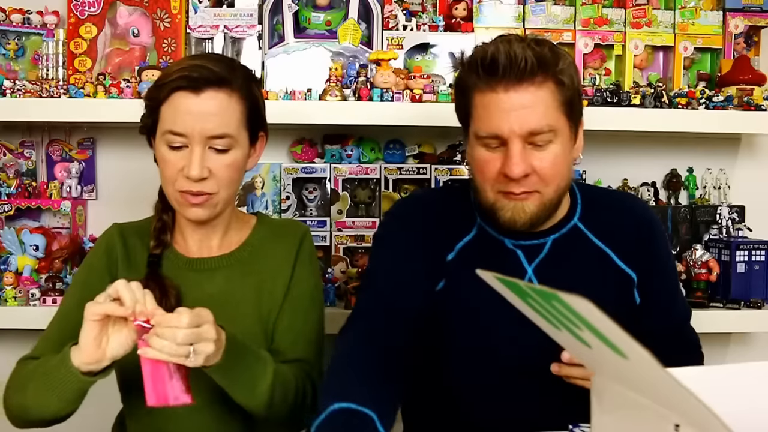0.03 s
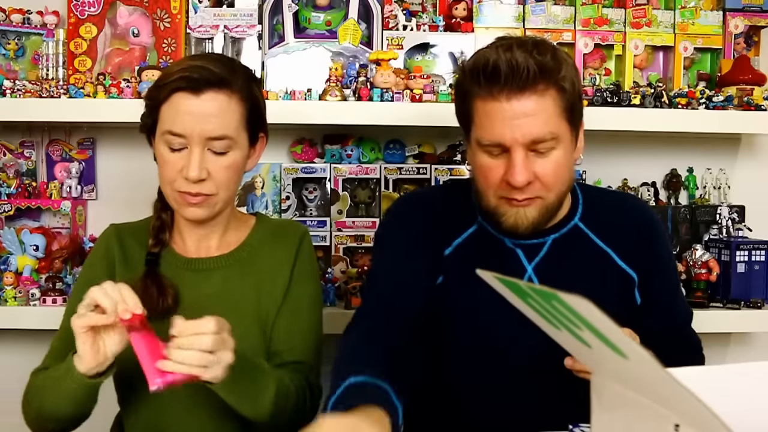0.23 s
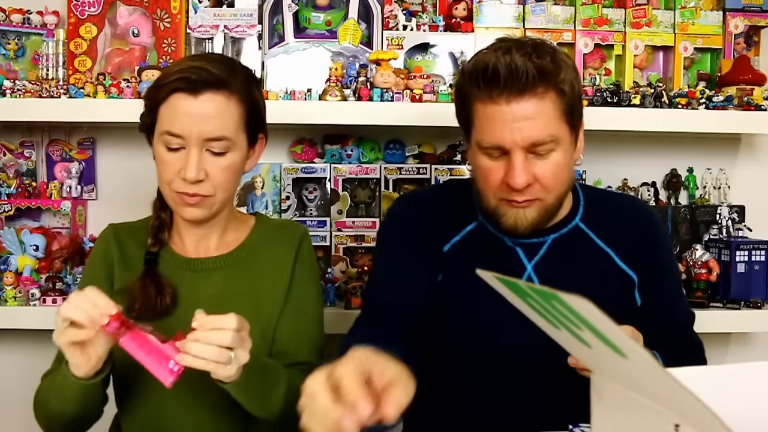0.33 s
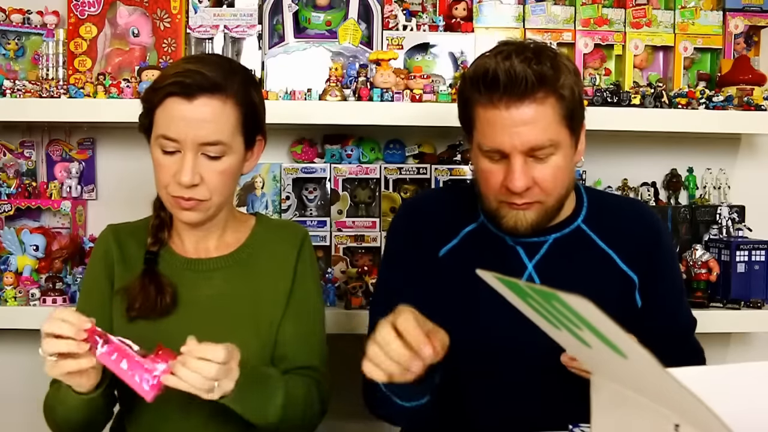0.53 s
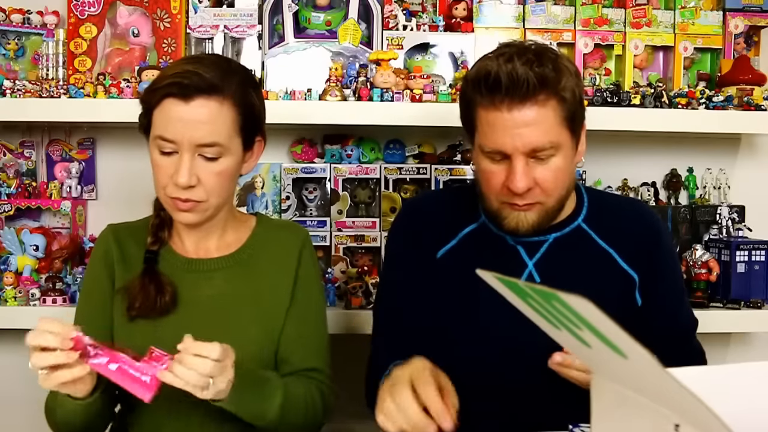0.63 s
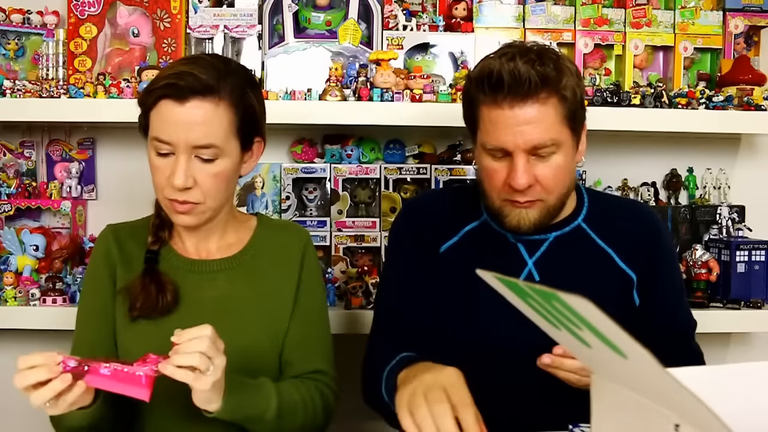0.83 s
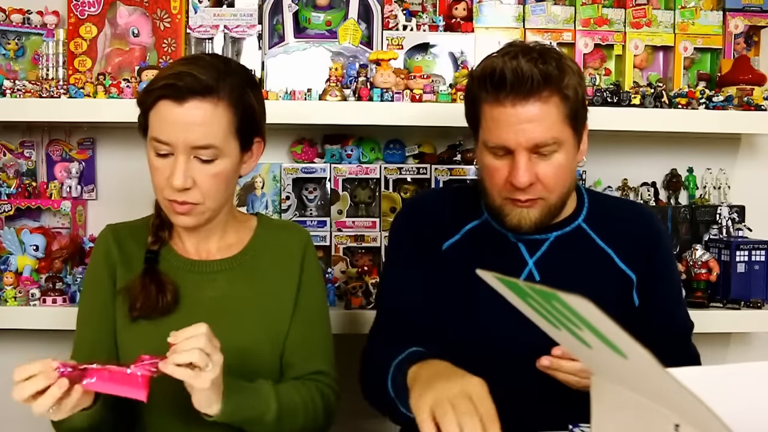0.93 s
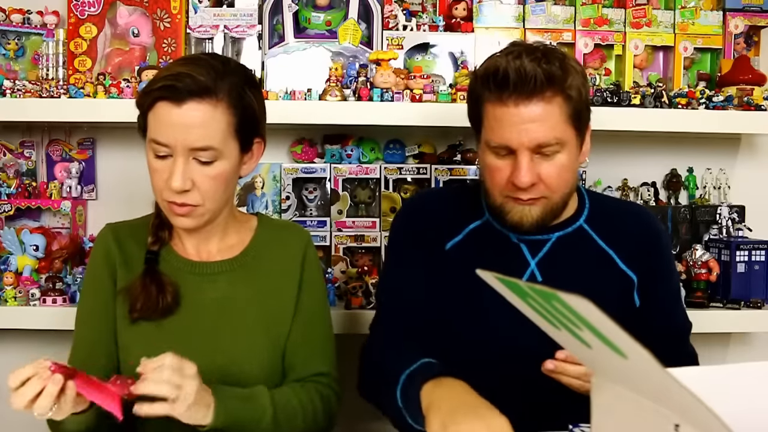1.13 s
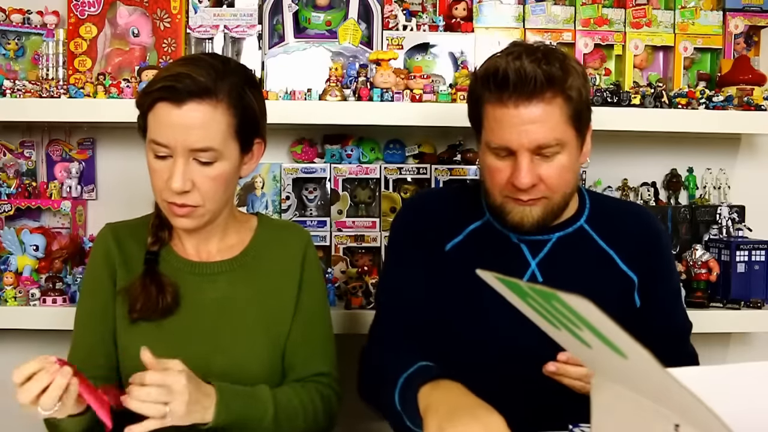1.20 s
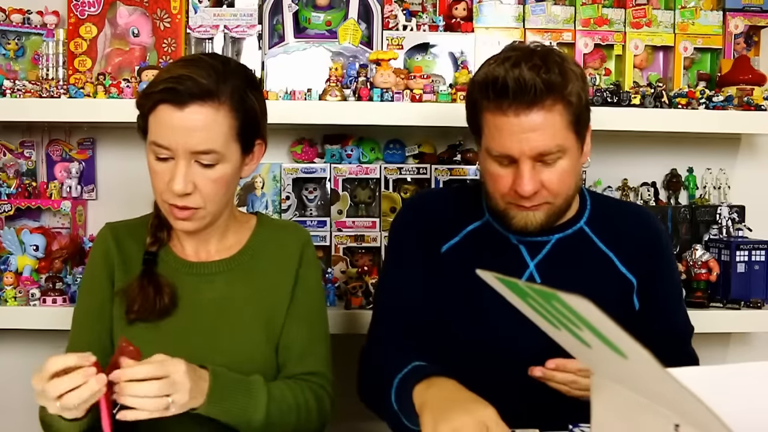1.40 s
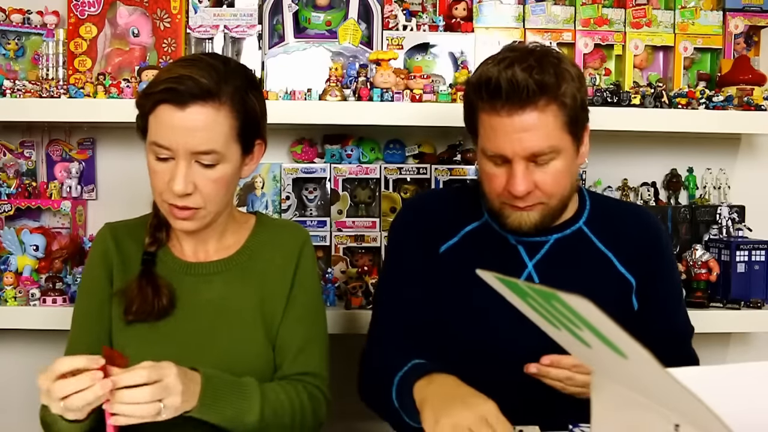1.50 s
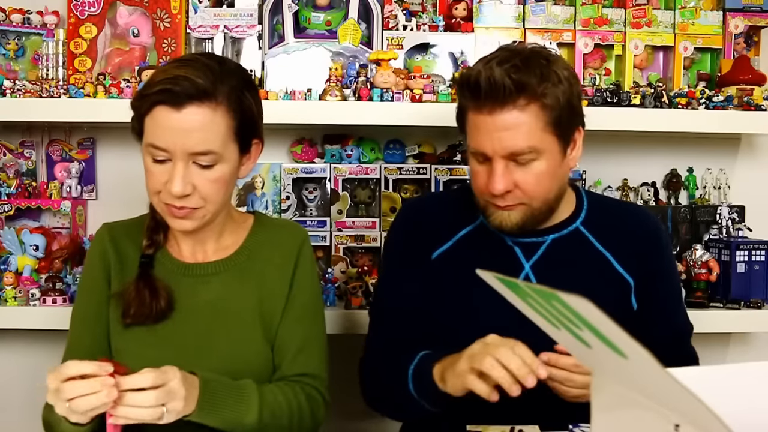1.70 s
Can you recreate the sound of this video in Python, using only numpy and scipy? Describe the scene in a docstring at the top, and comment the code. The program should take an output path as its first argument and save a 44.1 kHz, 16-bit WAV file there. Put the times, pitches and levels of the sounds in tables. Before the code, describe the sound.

Crackling plastic packet in the hands, slightly left: bright irregular snaps, an early arm bump on the table, a dense peak of crinkling, sparser ticks, then another small cluster, close up in a quiet room.

```python
"""A hand pulls open a thin plastic wrapper, slightly left of two microphones in a small quiet room.
From the start, creases buckle as sharp resonant snaps among flurries of crackle, showers of random clicks.
An arm then bumps the table, softly and at once loudly: thud, smack and decaying modes of the table top.
The snaps soon crowd together and peak, thin out, and gather again near the end among soft bumps.
Arm rumble, a wavering low sine hum and shaped noise as faint hiss lie underneath throughout."""
import sys
import numpy as np
from scipy import signal
from scipy.fft import rfft, irfft
from scipy.io import wavfile

SR = 44100
rng = np.random.default_rng(int(sys.argv[2]) if len(sys.argv) > 2 else 0)


def to_wav(s):
    """Save 16-bit WAV."""
    ch = np.atleast_2d(s).T  # columns
    pcm = np.round(np.clip(ch, -1, 1) * 32767)  # PCM
    wavfile.write(sys.argv[1], SR, pcm.astype(np.int16))


N = 77175

SIZE = 2048  # samples in a spectrum frame
HZ = np.fft.rfftfreq(SIZE, 1 / SR)
FLEX_HZ, FLEX_OCT = 1296, 1.15  # low flexing of the film: centre in Hz, width in octaves


def amp(db):
    """Logarithmic level: decibels to amplitude gain."""
    return 10 ** (np.asarray(db) / 20)


def unit(x):
    """Normalisation: scales to an rms of 1."""
    return x / np.sqrt(np.mean(x ** 2) + 1e-20)


def read(points, hz):
    """Logarithmic pitch scale: interpolates a curve along log frequency."""
    f, value = np.transpose(points)
    return np.interp(np.log(hz + 1), np.log(f + 1), value)


def add(mix, s, sound):
    """Superposition: adds a sound to the mix from time s in seconds."""
    part = mix[max(round(s * SR), 0):][:len(sound)]
    part += sound[:len(part)]


def hump(hz, octaves):
    """Resonance: a bell of unit mean power on a log-frequency axis, steeper below its centre."""
    low_side = 0.91  # width below the centre relative to that above
    away = np.log2((HZ + 1) / hz) / octaves
    away = np.where(away < 0, away / low_side, away)
    return unit(np.exp(-(away / 2) ** 2))


def pulse(gain):
    """Minimum phase: the causal click whose phase follows from its log spectrum by Hilbert transform."""
    log_gain = np.log(gain + gain.max() / 1000)  # the floor keeps the logarithm finite
    full = np.r_[log_gain, log_gain[-2:0:-1]]
    spectrum = np.exp(np.conj(signal.hilbert(full)))
    return np.fft.ifft(spectrum).real[:SIZE // 2]


def even(burst):
    """Partial whitening: flattens most of a burst's spectral unevenness and sets its energy to 1."""
    z = rfft(burst, 2 * len(burst))
    burst = irfft(z / (abs(z) + 1e-9) ** .75)[:len(burst)]
    return burst / np.linalg.norm(burst)


def click(drive, gain):
    """Source and filter: a short stereo drive excites a resonance, with energy set by its spectrum."""
    window_s = .00277  # the spectrum's level is the rms over this time
    sound = signal.fftconvolve(drive, pulse(gain)[None], axes=1)
    energy = np.mean(gain ** 2) * window_s * SR
    return sound / np.linalg.norm(sound.mean(0)) * np.sqrt(energy)


def diffuse(z, tone):
    """Spatial coherence: colours two noises and mixes them to a frequency-dependent likeness."""
    # Left-right likeness of diffuse sound. Each row: frequency in Hz, correlation from -1 to 1.
    likeness = [(50, -0.051), (300, 0.71), (1000, .8), (2500, 0.38), (5000, 0.72), (9000, -0.019),
                (14000, -0.067)]
    hz = np.fft.rfftfreq(z.shape[1], 1 / SR)
    a, b = rfft(z) * amp(read(tone, hz))
    same = np.clip(read(likeness, hz), -1, 1)
    right = same * a + np.sqrt(1 - same ** 2) * b
    return irfft(np.array([a, right]), z.shape[1])


def lean(db):
    """Level panning: raises the left and lowers the right by the same decibels."""
    return amp([[db], [-db]])


def snaps():
    """Buckling: each crease creaks, pops, excites film resonances and settles in tiny slips."""
    # Creases that buckle. Each row: time in seconds, ring level in dB before trim, film pitch in Hz,
    # flexing level in dB before trim, tick level in dB before trim, panel note in Hz,
    # panel level in dB before trim, settling time constant in seconds.
    creases = [(0.048, -31.5, 7550, -58, -45, 3680, -59, 0.00075),
               (0.0554, -41, 6600, -68, -47, 4220, -61, 0.0018),
               (0.089, -39.5, 4700, -38.5, -45.5, 2420, -60, 0.0048),
               (0.0921, -47, 7440, -46.5, -52, 2050, -50, 0.0018),
               (0.1663, -26.5, 9700, -30, -57, 1150, -42, 0.00082),
               (0.1916, -43, 6700, -38, -42.5, 1490, -41, 0.0042),
               (0.2298, -65, 7100, -47, -75, 1750, -58, 0.001),
               (0.2758, -17, 5670, -29, -29.5, 1730, -31.5, 0.00095),
               (0.2847, -56, 6640, -39, -33.5, 3030, -38, 0.0027),
               (0.2996, -33, 5940, -37, -31, 2670, -37.5, 0.0059),
               (0.3178, -33, 7300, -35.5, -31.5, 4100, -45, 0.0019),
               (0.3244, -35.5, 5400, -29, -39, 4160, -38, 0.0046),
               (0.346, -26.5, 9350, -52, -36, 4220, -63, 0.0011),
               (0.3724, -34, 7400, -34.5, -48, 4300, -55, 0.0022),
               (0.3794, -23, 7500, -37, -44, 3150, -48, 0.0019),
               (0.3892, -37, 8000, -44, -48, 2910, -41, 0.0012),
               (0.4089, -24.5, 8300, -54.5, -37, 2830, -38.5, 0.0015),
               (0.4559, -50, 5800, -56, -46, 3960, -50, 0.0012),
               (0.4647, -29, 6300, -41, -47, 2540, -68, 0.00048),
               (0.53, -41.5, 6900, -43.5, -49.5, 4200, -61, 0.00047),
               (0.5848, -32, 7000, -47.5, -57, 1590, -49.5, 0.00043),
               (0.603, -25, 8100, -39, -34, 4300, -42, 0.0012),
               (0.6224, -32, 7160, -45, -42, 2660, -42, 0.0021),
               (0.6784, -52, 5200, -49, -66, 4300, -60, 0.0027),
               (0.7651, -32.5, 6560, -47.5, -42.5, 4290, -54, 0.00058),
               (0.8025, -41, 6450, -57, -51, 2680, -53.5, 0.0008),
               (0.9144, -60, 6600, -73, -69, 3860, -78.5, 0.0011),
               (0.9398, -47, 6700, -56, -54.5, 4320, -54, 0.0016),
               (0.998, -34, 4440, -50, -42, 4240, -44, 0.0021),
               (1.0053, -41, 4550, -62, -64, 4100, -60, 0.0012),
               (1.1168, -37.5, 6940, -41, -40.5, 2380, -44.5, 0.0011),
               (1.1539, -41.5, 5800, -45.5, -48, 3700, -49, 0.0027),
               (1.1903, -48, 4530, -49.5, -65, 4140, -54, 0.0012),
               (1.2203, -48, 3920, -49, -57, 3730, -51, 0.00081),
               (1.2801, -45.5, 4950, -52, -63, 3530, -66, 0.002),
               (1.2933, -40.5, 7260, -38, -37, 2670, -46, 0.0018),
               (1.3147, -31.5, 9000, -39.5, -39, 3750, -48, 0.0019),
               (1.336, -26, 5640, -38, -42, 4000, -49, 0.0028),
               (1.347, -46, 5300, -38.5, -54, 1600, -42, 0.002),
               (1.35, -31, 5460, -55, -59, 4130, -53, 0.002),
               (1.4429, -50, 4500, -44, -62, 3810, -60, 0.0018),
               (1.4554, -31, 4400, -29.5, -34, 3400, -42, 0.0013),
               (1.462, -44.5, 5500, -57, -49, 4100, -64, 0.0036),
               (1.593, -52, 5030, -39.5, -70, 2490, -44.5, 0.0029),
               (1.6591, -42.5, 6300, -59, -74, 1670, -57.5, 0.0019)]
    ring_trim_db, flex_trim_db, tick_trim_db, panel_trim_db = -1, -1.5, 3, -0.5
    ring_oct, panel_oct = 0.32, .08  # widths in octaves; the stretched panel's note is narrow
    tick_hz, tick_oct, tick_slips = 11300, 0.22, 1.6  # tick_slips: gain of the whole drive beside the pop
    lead_s, lead_share = 0.00036, 0.24  # the creak before the crease gives: time constant, energy share
    slip_share = 0.65  # energy share of the slips, the pop taking the rest
    scatter_db = -10  # the film's facets radiate differently to left and right
    out, onset = np.zeros((2, N)), SIZE // 32 / SR
    t = np.arange(SIZE // 4) / SR - onset  # seconds from the pop
    pop = 1. * (t == 0)
    for s, ring_db, hz, flex_db, tick_db, panel_hz, panel_db, settle in creases:
        ring = amp(ring_db + ring_trim_db) * hump(hz, ring_oct)
        flex = amp(flex_db + flex_trim_db) * hump(FLEX_HZ, FLEX_OCT)
        panel = amp(panel_db + panel_trim_db) * hump(panel_hz, panel_oct)
        film = np.sqrt(ring ** 2 + flex ** 2 + panel ** 2)
        tick = amp(tick_db + tick_trim_db) * hump(tick_hz, tick_oct)

        settling = np.exp(-abs(t) / settle) * (t > 1e-4)
        slips, stray = rng.standard_normal((2, len(t))) * settling
        creak = rng.standard_normal(len(t)) * np.exp(-abs(t) / lead_s) * (t < 0)
        drive = np.sqrt(slip_share) * unit(slips) + np.sqrt(1 - slip_share) * unit(pop)
        drive = drive + np.sqrt(lead_share) * unit(creak)
        scatter = amp(scatter_db) * np.outer([1, -1], even(stray))
        pair = even(drive) + scatter

        sound = click(pair, film) + click(pop + tick_slips * pair, tick)
        for channel, part in zip(out, sound):
            add(channel, s - onset, part)
    return out


def grains(hz, octaves, per_s):
    """Shot noise: a steady random shower of clicks of uneven size through one film resonance."""
    size_db = 0.5 * np.minimum(rng.exponential(1, N), 4)
    size = amp(size_db) * rng.choice([-1, 1], N)
    clicks = size * (rng.random(N) < per_s / SR)
    return unit(signal.oaconvolve(clicks, pulse(hump(hz, octaves)))[:N])


def clumps():
    """Amplitude modulation: a random level, drawn every few milliseconds, gathers grains in clusters."""
    step_s = .004
    t, knots = np.arange(N) / SR, np.arange(0, N / SR + step_s, step_s)
    level = np.interp(t, knots, rng.uniform(-1.5, 1.5, len(knots)))
    return unit(amp(5 * level))


def crackle(count=8):
    """Superposed shot noise: many small film patches crackle under the envelope of the pulls."""
    # Flurries of crackle. Each row: start in seconds, length in seconds, fine crackle level in dB,
    # low flexing level in dB.
    flurries = [(0.0, 0.01, -37, -43.5), (0.008, 0.14, -53, -55.5), (.18, 0.18, -51.5, -54.5),
                (0.288, 0.048, -39.5, -40), (0.35, 0.028, -57, -48.5), (.372, 0.037, -36.5, -44),
                (0.439, 0.033, -51, -51), (0.61, 0.039, -53, -57), (0.787, 0.028, -54.5, -52.5),
                (1.018, 0.036, -56, -58.5), (1.13, 0.055, -53.5, -68), (1.218, 0.035, -58.5, -61),
                (1.272, 0.065, -48.5, -52.5), (1.34, 0.02, -43, -41.5), (1.384, 0.075, -55, -56.5),
                (1.481, 0.094, -76, -58.5), (1.582, 0.055, -60.5, -57), (1.648, 0.027, -58.5, -70.5)]
    rise_s, fall_s = 0.0018, 0.0056
    grains_per_s, grain_hz, grain_oct = 2200, 6300, 0.54  # over all patches, centre, patch width
    t, high, low = np.arange(N) / SR, np.zeros(N), np.zeros(N)
    for s, length, db, flex_db in flurries:
        rise = np.clip((t - s) / rise_s, 0, 1)
        pull = rise * np.exp(-np.maximum(t - s - length, 0) / fall_s)
        high += amp(db) * pull
        low += amp(flex_db) * pull

    fine = np.zeros(N)
    for octave in 0.47 * np.linspace(-2, 2, count):  # patch pitch from the centre
        weight = np.sqrt(np.exp(-abs(octave)))
        fine += weight * grains(grain_hz * 2 ** octave, grain_oct, grains_per_s / count)
    flexing = grains(FLEX_HZ, FLEX_OCT, grains_per_s)
    return clumps() * (high * unit(fine) + low * flexing)


def table_bumps():
    """Modal excitation: a soft blow gives a smack and a short thud and rings the table top."""
    # Bumps on the table. Each row: time in seconds, relative level in dB, contact time in seconds.
    bumps = [(.143, -18, .008), (0.1524, 0, 0.0041), (.771, -30.5, 0.0027), (1.232, -31.5, 0.0022),
             (1.334, -39, 0.0032), (1.593, -31, 0.0047), (1.622, -41.5, 0.0044)]
    # Modes of the table top. Each row: frequency in Hz, relative level in dB, 60 dB decay in seconds.
    modes = [(112.7, -8, 0.21), (260, -11.5, .1), (337.6, -1, 0.11), (439, -2, 0.06), (510, -11, 0.1),
             (622.3, 7, 0.036), (694, -17, 0.032), (944, 2, 0.043), (1059, -2.5, 0.1), (1181, 2.5, 0.028),
             (1293, -4, 0.067), (1490, -3, 0.032), (1621, -6.5, 0.046), (1898, -29, 0.11),
             (2116, -9.5, 0.039)]
    # Spectrum of the thud. Each row: frequency in Hz, relative density in dB.
    thud_tone = [(40, -51), (120, -33.5), (300, -66), (650, 13), (1100, -18), (2100, -3), (3000, -16),
                 (8000, -18)]
    ring_db, thud_db, smack_db = -18.5, -20.5, -9.5  # added to each bump's level
    rise_cycles = 1.76  # each mode takes this long to build up
    smack_hz, smack_oct, smack_delay_s, smack_s = 3700, .35, 0.0025, .0015  # smack_s: decay constant
    out, t = np.zeros(N), np.arange(SR // 3) / SR

    ring = np.zeros(len(t))
    for k, (hz, db, t60) in enumerate(modes):
        rise = 1 - np.exp(-(hz * t / rise_cycles) ** 2)
        decay = amp(db - 60 * t / t60)
        ring += (-1) ** k * decay * rise * np.sin(2 * np.pi * hz * t)  # neighbours in opposite phase
    colour = pulse(amp(read(thud_tone, HZ)))
    colour = colour / np.linalg.norm(colour)
    smack_colour = pulse(hump(smack_hz, smack_oct))

    for s, db, contact in bumps:
        push = even(rng.standard_normal(len(t)) * t / contact * np.exp(-t / contact))
        push = push * np.sqrt(contact * SR)  # longer contact carries more energy
        thud = signal.fftconvolve(push, colour)[:len(t)]
        add(out, s, amp(db) * (amp(ring_db) * ring + amp(thud_db) * thud))

        burst = even(rng.standard_normal(SIZE) * np.exp(-t[:SIZE] / smack_s))
        smack = signal.fftconvolve(burst, smack_colour)
        add(out, s + smack_delay_s, amp(db + smack_db) * smack)
    return out


def direct(x):
    """Interchannel phase and level: the straight path reaches two microphones a little out of step."""
    # Phase between the microphones. Each row: frequency in Hz, lead of the left in radians.
    phase_lead = [(100, -0.52), (2000, 0.19), (6000, -0.91), (10000, -1.1), (15000, -2.3)]
    half_turn = np.exp(.5j * read(phase_lead, np.fft.rfftfreq(N, 1 / SR)))
    return lean(1.1) * irfft(rfft(x) * np.array([half_turn, 1 / half_turn]), N)


def room(x):
    """Reverberation: sparse quick reflections from table and shelves, then a decaying noise tail."""
    # Decay of the tail. Each row: frequency in Hz, 60 dB decay time in seconds.
    decay = [(100, 0.12), (500, 0.19), (1500, 0.34), (5000, 0.27), (9000, 0.25), (16000, 0.29)]
    # Colour of the reflections. Each row: frequency in Hz, gain in dB.
    reflection_tone = [(100, -6), (500, 4), (1500, -6.5), (5000, -2), (9000, -4), (15000, -2)]
    tail_db, early_db, early_s, gap_s = -1, -4.5, 0.0055, 0.0033
    t = np.arange(SR // 2) / SR
    hz, when, z = signal.stft(rng.standard_normal((2, len(t))), SR, nperseg=256)
    fading = z * amp(-60 * when / read(decay, hz)[:, None])
    tail = signal.istft(fading, SR, nperseg=256)[1][:, :len(t)]
    tail = tail * np.clip(t / gap_s - .5, 0, 1)  # fades in from half a gap to one and a half

    arrivals = (rng.random(len(t)) < 2000 / SR) * (t > .001)
    early = rng.standard_normal(tail.shape) * arrivals * np.exp(-t / early_s)
    both = amp(tail_db) * unit(tail) + amp(early_db) * unit(early)
    response = diffuse(both, reflection_tone) / np.sqrt(len(t))
    return lean(.5) * signal.fftconvolve(x[None], response, axes=1)[:, :N]


def blended_room(x, count=3):
    """Crossfade at constant power: random sets of reflections take turns, so no one colouring lasts."""
    turn = np.arange(N) / SR * 4.96  # sets passed, at this many per second
    out = np.zeros((2, N))
    for k in range(count):
        away = abs((turn - k + count / 2) % count - count / 2)
        out += room(x * np.cos(np.pi / 2 * np.minimum(away, 1)))
    return out


def background():
    """Shaped noise and a phase-wandering sine: room air, rumble of moving arms and a low hum."""
    # Spectrum of the room air. Each row: frequency in Hz, relative density in dB.
    air_tone = [(20, -8), (55, -21), (110, -12), (170, -2), (400, -18), (1000, -21), (2500, -16),
                (8000, -17), (16000, -20)]
    # Level of the arm rumble. Each row: time in seconds, level in dB before the lean to the left.
    rumble_level = [(0, -46), (.115, -55), (.155, -47.5), (.172, -34), (.2, -43.5), (.3, -57), (.42, -62),
                    (1.21, -70.5), (1.24, -48), (1.28, -54.5), (1.335, -51), (1.4, -61.5), (1.75, -65)]
    # Spectrum of the arm rumble. Each row: frequency in Hz, relative density in dB.
    rumble_tone = [(20, -12), (55, -9), (85, -3.5), (125, -3), (165, -11), (400, -15.5), (900, -20),
                   (3000, -79.5)]
    t = np.arange(N) / SR
    air = amp(-64) * unit(diffuse(rng.standard_normal((2, N)), air_tone))
    rumble = unit(diffuse(rng.standard_normal((2, N)), rumble_tone))
    rumble = amp(np.interp(t, *np.transpose(rumble_level))) * rumble
    wander = 0.027 * np.cumsum(rng.standard_normal(N))  # radians
    hum = amp(-71.5) * unit(np.sin(2 * np.pi * 111 * t + wander))
    return air + lean(2.95) * (rumble + hum)


def scene():
    """Superposition: direct sound, reflections and background of wrapper and table."""
    film, wood = snaps() + crackle(), table_bumps()
    into_room = film.mean(0) + amp(-7) * wood  # the table excites the room less
    return direct(film + wood) + blended_room(into_room) + background()


def record(dry):
    """Band limiting: a linear-phase low-pass filter removes the extreme treble."""
    edge_hz = 16200
    low_pass = signal.firwin(401, edge_hz, window=("kaiser", 8), fs=SR)
    return signal.oaconvolve(dry, low_pass[None], "same")


dry = scene()
out = record(dry)
to_wav(out)
```